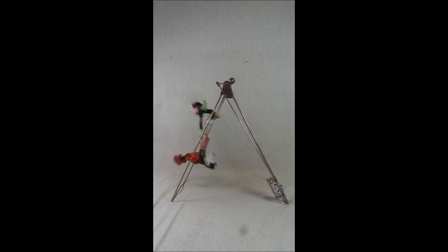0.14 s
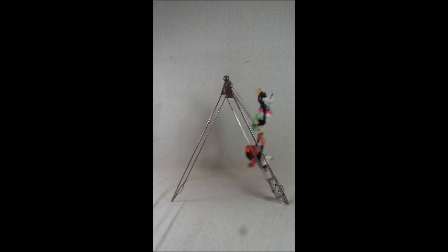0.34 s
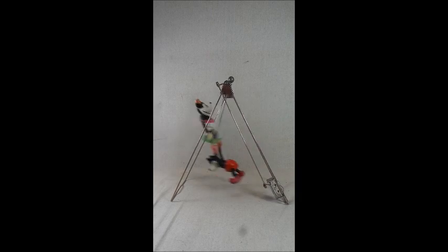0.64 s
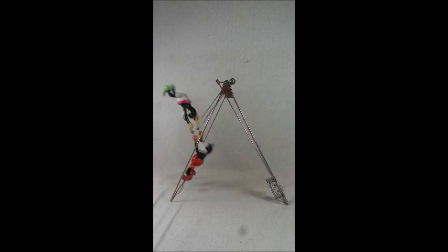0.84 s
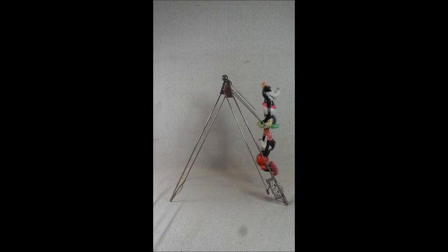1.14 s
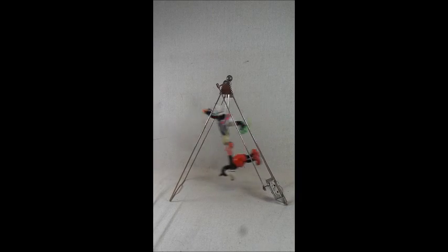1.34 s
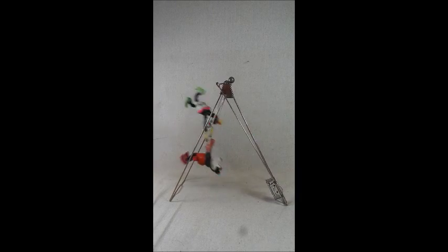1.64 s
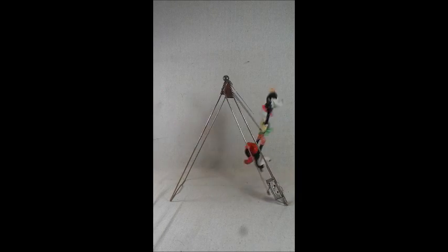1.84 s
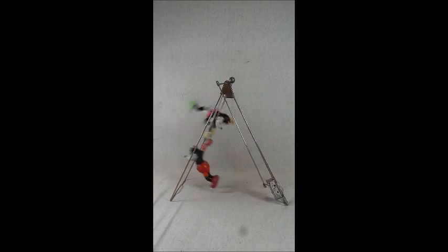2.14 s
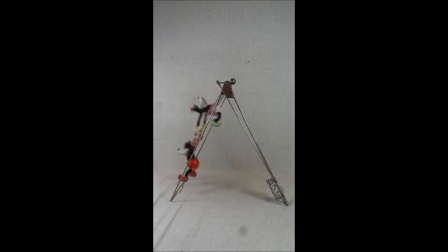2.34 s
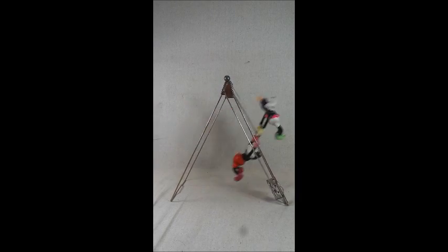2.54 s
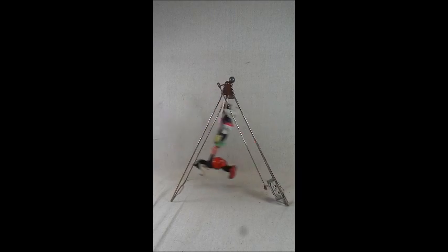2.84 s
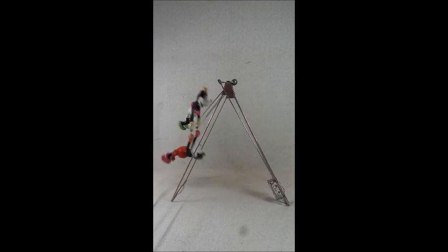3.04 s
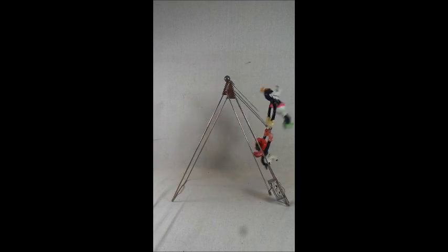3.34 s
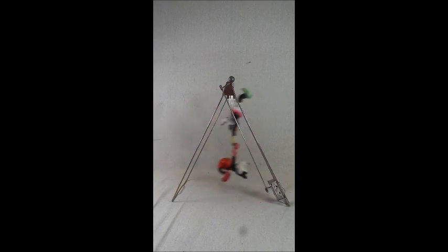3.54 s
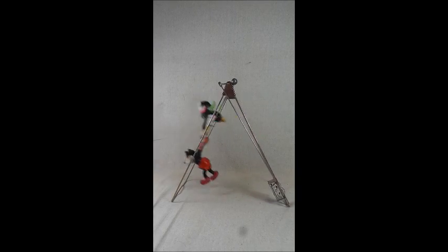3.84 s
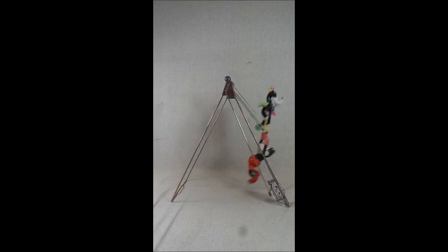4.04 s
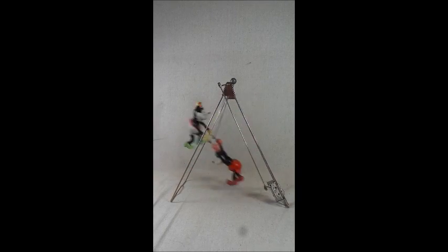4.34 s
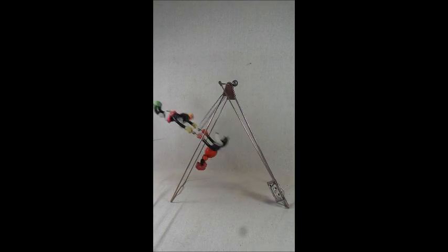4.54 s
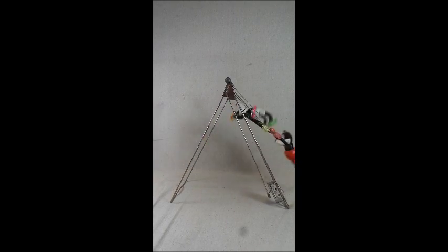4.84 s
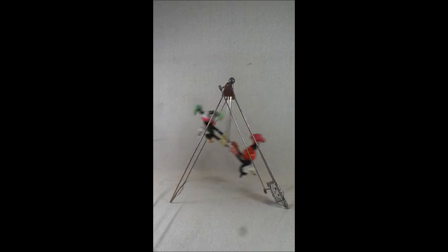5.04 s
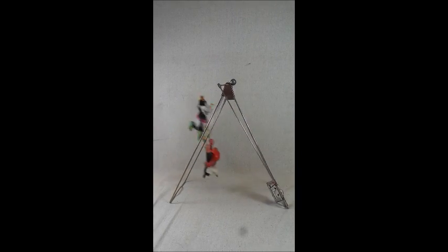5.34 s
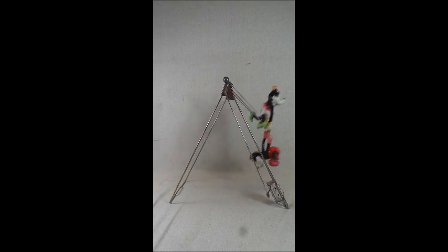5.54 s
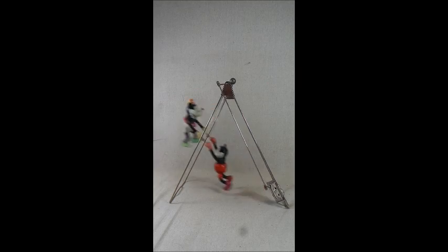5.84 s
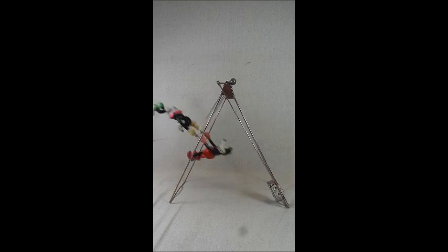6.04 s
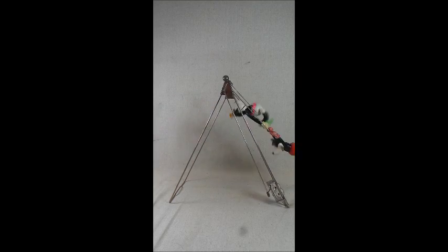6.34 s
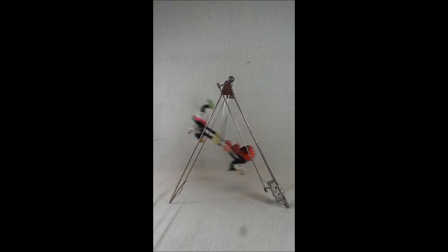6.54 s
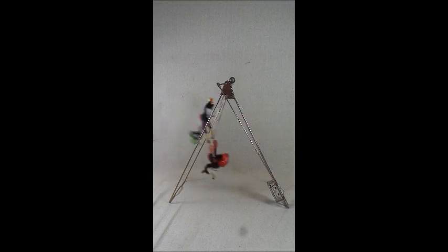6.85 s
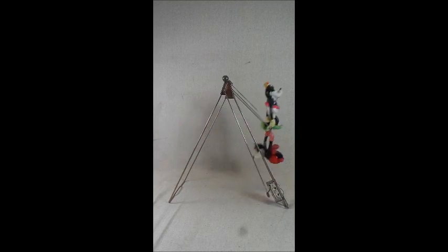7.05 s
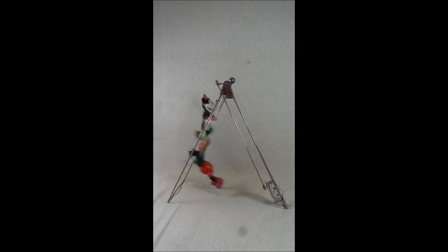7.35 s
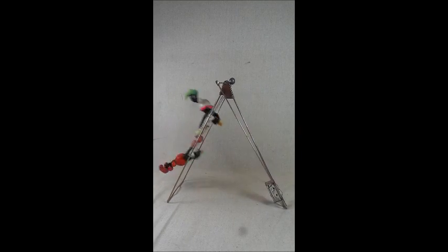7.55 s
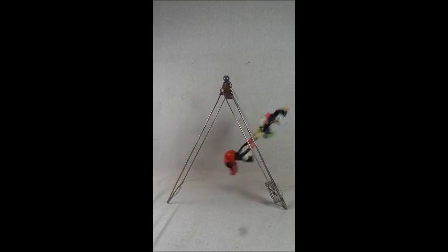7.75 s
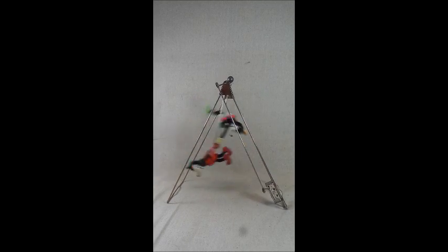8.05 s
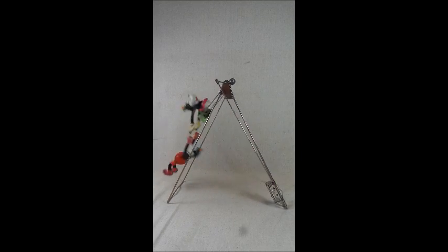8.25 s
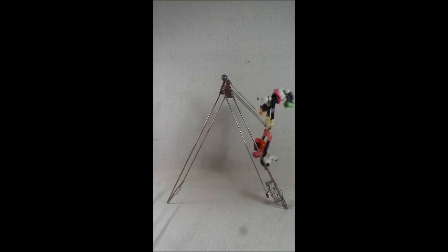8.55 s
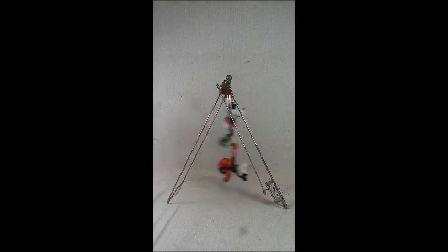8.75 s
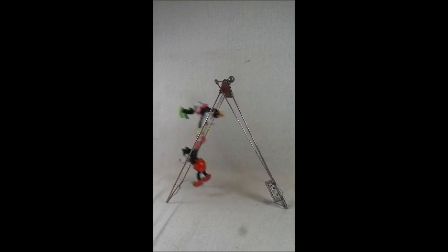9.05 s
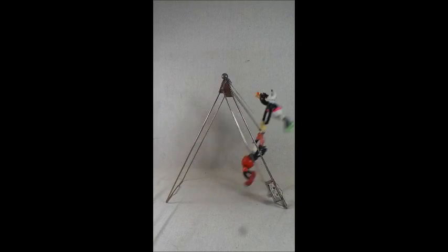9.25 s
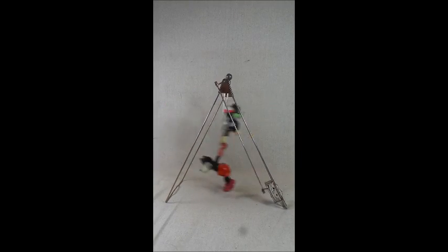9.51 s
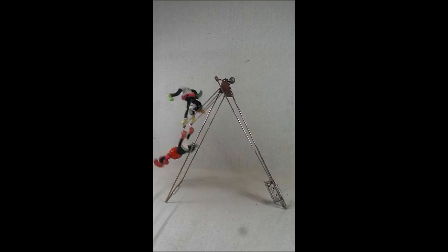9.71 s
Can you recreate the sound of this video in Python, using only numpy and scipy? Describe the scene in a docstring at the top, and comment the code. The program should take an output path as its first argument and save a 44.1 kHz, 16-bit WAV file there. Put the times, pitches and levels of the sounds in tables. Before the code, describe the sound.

A small tin clockwork swing with two jointed tumbling figures runs continuously on a table, heard close in a small bare room with a short bright reflection and very faint room tone. From about 0.2 s to 9.8 s the crank catches every 0.33 to 0.4 s, slightly unevenly: a sharp, dry, high metallic clack, a soft low table thump just after, and often a tiny ping. Loose figures clack irregularly between, densely around 1.2-1.6 s, with strong clacks near 7.05 and 9.67 s. Small tin tinks ring near 1.2, 2.25, 5.0 and 5.5 s. Some catches have a light touch just before them. Quiet gears and scraping swell into each catch; return strokes carry faint slipping whistles, then a rising one. Thin axle chirps stand out near 0.5 and 1.26 s and again around 9.0-9.4 s. The motion is still going at the end.

```python
"""In a small bare room, a tin clockwork swing runs on a table over a faint bed of room tone.
Contacts excite the damped modes of frame, figures and motor housing: the crank touches and catches, loose figures clack.
Each catch also thumps the table top, and many make the frame's top bar ping. Gears and a scraping axle run up to
every catch. The axle chirps at times, and on each return stroke slips twice in faint song before a rising whistle.
Decaying noise adds the walls' answer to the clatter, gears and squeaks."""
import sys
import numpy as np
from scipy import signal
from scipy.fft import rfft, irfft, next_fast_len
from scipy.io import wavfile
from scipy.ndimage import uniform_filter1d, map_coordinates

SR = 44100
rng = np.random.default_rng(int(sys.argv[2]) if len(sys.argv) > 2 else 0)


def master_out(mix):
    """Clip the mix to full scale and print it as 16-bit PCM to the path in sys.argv[1]."""
    frames = np.transpose(np.atleast_2d(mix))
    ceiling = np.clip(frames, -1, 1)
    pcm = np.round(ceiling * 32767).astype(np.int16)
    wavfile.write(sys.argv[1], SR, pcm)


N = 435708  # length in samples
SIZE, LEAD = 2 ** 13, 1024  # event row length, and its part ahead of the contact (samples)

# Resonances of the parts, all four alike: pitch_hz, width_hz, strength_db
FRAME_MODES = [(4580, 830, -4), (7020, 150, 2.5), (8560, 290, -9.5), (7360, 17900, -3.5), (9930, 670, 2),
               (11400, 360, -21), (11720, 810, -2.5)]
FIGURE_MODES = [(1910, 72, -18.5), (2350, 170, -4), (2810, 1460, -21), (3353, 290, -5), (2963, 1950, -7.5)]
HOUSING_MODES = [(558, 150, -18), (946, 164, -3), (860, 110, -5), (1516, 120, -9)]
TABLE_MODES = [(114.5, 6.34, 5.5), (145.4, 13.7, 2.5), (204.7, 27, -8), (243.6, 37, -5), (292, 82, -10),
               (447, 390, -19.5)]
# Crank catches, outward and return stroke in turn:
# start_s, frame_level_db (peak), nominal_t60_s, thump_level_db (peak), grind_level_db (gears before it)
CATCHES = [(0.185, -14, 0.035, -23.5, -60.5), (0.5285, -14.5, 0.071, -27, -55),
           (0.9308, -15.5, 0.04, -27, -68), (1.257, -16.5, 0.15, -26.5, -53), (1.6736, -14, 0.04, -24, -77),
           (2.014, -13.5, 0.086, -25, -56.5), (2.404, -15, 0.067, -24, -57), (2.74, -15.5, 0.098, -25, -62),
           (3.118, -14.5, 0.06, -22.5, -68), (3.478, -17, 0.066, -28, -56), (3.873, -17, 0.057, -23, -78),
           (4.217, -16.5, 0.069, -26.5, -57), (4.6081, -17, 0.05, -22.5, -63),
           (4.9695, -14.5, 0.1, -27, -66), (5.361, -14.5, 0.048, -25, -57.5), (5.7, -16.5, 0.1, -25, -73),
           (6.094, -19, 0.14, -22, -75), (6.4502, -15.5, 0.18, -25, -67), (6.846, -16.5, 0.05, -23.5, -73),
           (7.188, -17, 0.097, -24, -69), (7.6, -14, 0.03, -23, -71), (7.9522, -15, 0.11, -25.5, -65),
           (8.331, -13, 0.029, -25, -54), (8.6772, -16.5, 0.094, -24, -60), (9.067, -15, 0.039, -23.5, -51),
           (9.4235, -15, 0.11, -25.5, -54), (9.8089, -14, 0.043, -22, -82)]
# First touches of the crank on the frame, just ahead of a catch: start_s, frame_level_db (peak)
TOUCHES = [(0.5096, -37), (2.719, -28), (3.2962, -35), (4.199, -25), (4.944, -23.5), (5.3307, -23.5),
           (5.677, -22.5), (6.062, -35), (6.086, -18.5), (6.428, -28), (6.836, -25), (7.589, -32),
           (7.9322, -29.5), (8.656, -19.5), (9.403, -25)]
# Clacks of loose figures: start_s, figure_level_db (peak), frame_db and housing_db (re the figures), nominal_t60_s
CLACKS = [(0.106, -17, -4, -12.5, 0.058), (0.356, -35, -7, -4, 0.062), (0.371, -26, -17, -9, 0.34),
          (0.409, -28, -17, -18, 0.16), (0.492, -33.5, 8, -18, 0.04), (0.633, -28.5, -8, -15, 0.089),
          (0.6972, -28.5, -5, -3.5, 0.13), (0.7219, -25, -6, -16, 0.17), (0.754, -27, -1, -1.5, 0.013),
          (0.805, -22.5, -15, -15, 0.046), (1.035, -34, -22, -19, 0.047), (1.0672, -29, -4, -9.5, 0.082),
          (1.175, -22.5, -18, -17, 0.041), (1.192, -27, -11, -10, 0.032), (1.262, -18.5, -12, -14, 0.12),
          (1.277, -20.5, 1.5, -25, 0.19), (1.294, -23, -3, -25, 0.26), (1.328, -28, -2, -24, 0.075),
          (1.3722, -21, -0.5, -11.5, 0.049), (1.4672, -25.5, -7, -7, 0.15), (1.5932, -19, -1.5, -13, 0.05),
          (1.833, -27, -1, -7.5, 0.049), (1.8815, -20.5, -20, -10.5, 0.034), (1.9745, -24, 6, -13, 0.21),
          (2.142, -24.5, -14, -14, 0.094), (2.247, -20.5, -20, -5.5, 0.052),
          (2.3483, -27.5, -15, -5.5, 0.19), (2.5892, -31.5, -15, -5, 0.46), (2.659, -31, -14, -10, 0.037),
          (2.809, -26, -28, -11, 0.15), (3.003, -37.5, -26, -2, 0.12), (3.082, -32, -21, -6.5, 0.34),
          (3.3857, -25, -17, -11, 0.069), (3.427, -26.5, 1, -8, 0.17), (3.6352, -22.5, -9, -16.5, 0.061),
          (3.7535, -27.5, -3, -9.5, 0.45), (3.802, -18.5, -6, -8.5, 0.036), (3.81, -18.5, 3, -6, 0.032),
          (3.971, -38, -9, -12, 0.06), (4.0652, -28, -5, -8, 0.43), (4.385, -34.5, -2, -1.5, 0.14),
          (4.401, -31, 2, -17, 0.017), (4.443, -32, -20, -1, 0.27), (4.562, -37, -3, -1, 0.04),
          (4.74, -35, -14, -3.5, 0.15), (5.0657, -24.5, -14, -9.5, 0.069), (5.444, -30, -4, -9.5, 0.097),
          (5.485, -21.5, -23, -17, 0.1), (5.5426, -25, 0, -9, 0.12), (5.8, -37, -20, -25, 0.075),
          (5.8497, -38, 15.5, 3, 0.012), (5.896, -25.5, -4, -24, 0.021), (5.933, -30.5, -27, -4.5, 0.24),
          (6.225, -43.5, -11, 0, 0.022), (6.281, -25, -21, -9.5, 0.086), (6.369, -31, -19, -3, 0.061),
          (6.516, -24.5, 2, -30, 0.027), (6.5473, -21, -24, -12.5, 0.035), (6.624, -44.5, -22, 2, 0.27),
          (6.6703, -29, -1, -11, 0.04), (6.7155, -25.5, -10, -5.5, 0.077), (6.7385, -20.5, -3, -21, 0.055),
          (7.0503, -15, -13, -18.5, 0.035), (7.167, -40, 16.5, -6, 0.13), (7.399, -24.5, -7, -7.5, 0.21),
          (7.422, -20, -5, -11.5, 0.11), (7.364, -38.5, -7, 0.5, 0.14), (7.4852, -21, -10, -16, 0.062),
          (7.7611, -25.5, -4.5, -10.5, 0.22), (7.891, -22, -24, -39, 0.013), (8.058, -21.5, -12, -15, 0.16),
          (8.156, -32, -21, -21, 0.2), (8.1881, -23.5, -0.5, -19, 0.023), (8.2618, -23, -8, -22, 0.045),
          (8.298, -33, 1, -12, 0.07), (8.5841, -33.5, -14, -4, 0.33), (8.864, -55, -18, -17, 0.036),
          (8.899, -20.5, -7.5, -30, 0.04), (9.3366, -23.5, -13, -10, 0.032), (9.561, -23, -21, -15.5, 0.14),
          (9.57, -27.5, -22, -8, 0.04), (9.656, -34.5, -1, 4, 0.02), (9.6666, -15.5, -22, -8, 0.02),
          (9.678, -16.5, 0, -23, 0.035), (9.765, -43, 10, -11, .05)]
# Pings of the frame's top bar as the crank lands: middle_s, level_db (peak)
PINGS = [(0.188, -15), (0.532, -19), (0.933, -20.5), (1.297, -23), (1.679, -28), (2.414, -22), (2.752, -37),
         (3.131, -27), (3.483, -17), (3.879, -16.5), (4.218, -20), (4.618, -19), (4.975, -20.5),
         (5.367, -19), (5.704, -17), (6.1, -15), (6.456, -26), (6.854, -19), (7.605, -16.5), (8.339, -19),
         (8.68, -24), (9.075, -15.5), (9.816, -14)]
# Single pieces of tin ringing out of a clack: middle_s, pitch_hz, level_db (peak)
TINKS = [(1.179, 2980, -23), (2.25, 1060, -27), (4.994, 2880, -23.5), (5.487, 3200, -26)]
# Loudest chirps of the dry axle: middle_s, pitch_hz, level_db (before flutter), length_s (scale of the swell)
CHIRPS = [(0.512, 7900, -24, 0.012), (1.258, 8100, -22.5, 0.014), (1.967, 13500, -40, .03),
          (4.16, 13100, -35, 0.069), (4.886, 8210, -33, 0.047), (5.612, 8190, -37.5, 0.066),
          (6.339, 8400, -49, 0.022), (7.858, 7140, -38, 0.04), (8.599, 8060, -34, 0.014),
          (9.042, 7580, -30, .02), (9.345, 8000, -28.5, 0.022), (9.41, 7800, -23, 0.019)]
# Modes on which the slipping axle sings: pitch_hz, first_slip_db, second_slip_db (before scatter)
SINGING_MODES = [(6950, -48, -50), (8200, -59, -52), (9750, -54, -61), (11600, -54, -61), (13400, -58, -52)]
# Decay of the walls' answer: pitch_hz, t60_s
WALLS = [(150, 0.45), (2000, 0.2), (12000, 0.15)]
# Spectrum of the room tone, relative: pitch_hz, density_db
ROOM_TONE = [(20, 26), (60, 16), (120, 34), (400, -39), (1000, 9), (14000, -41)]

# Pairs hold the outward stroke, then the return stroke
CATCH_RISE_S, CATCH_FIGURES_DB, CATCH_HOUSING_DB = (0.0094, 0.0068), -8, -17  # levels re the frame
TOUCH_T60_S, TOUCH_RISE_S, TOUCH_FIGURES_DB, TOUCH_HOUSING_DB = 0.075, 0.0064, -18.5, -17
CLACK_RISE_S = 0.00058
CATCH_COLOUR_DB, CLACK_COLOUR_DB = 2, 2.2  # scatter of mode strengths from blow to blow
PITCH_SCATTER = 0.035  # share by which the loose tin's modes shift from blow to blow
THUMP_LAG_S, THUMP_SCATTER_DB = (0.0081, 0.00436), 2
THUMP_DAMPED_S = 0.07  # the rocking frame settles on its feet and damps the boom
PING_HZ, PING_RISE_S, PING_T60_S = 7020, 0.0013, 0.0094
RUN_UP_S, RUN_ON_S = (0.197, 0.164), (0.05, 0.012)  # turning before and after the catch
RUN_GROWTH_DB, SCRAPE_DB = (4.5, 5.5), (-80, -60)
SHAKE_DB, SHAKE_FOLLOWS, USUAL_GRIND_DB = -52, 0.33, -54.5  # shake at the usual grind; dB per dB of grind
RISE_PER_S = 0.401  # share of the pitch gained a second
STOPS_FASTER = 9.1  # a chirp ends more quickly than it swells
WAVER_HZ, FLUTTER_DB, FAINT_ROUGHER = 90, 5, 1.6  # unsteadiness of a whistle; factor for faint ones
WHISTLE_LEAD_S = 0.04  # from the contact position in a row to a whistle's middle
SLIPS_AHEAD_S = (0.14, 0.075)  # middles of first and second slip, ahead of the catch
SING_S, SING_SCATTER_S, SING_SCATTER_DB, SING_SCATTER_PITCH = 0.05, 0.008, 4, 0.01
SWEEP_AHEAD_S, SWEEP_HZ, SWEEP_DB, SWEEP_RISE_PER_S = 0.04, 9000, -51, 3.5
TOP_HZ, EDGE_HZ = 15900, 14460  # band limit; start of the steep fade
DULLS_HZ, DULLS_DB_PER_HZ = 10800, -0.0012  # gentle loss of the top treble


def clatter():
    """Impact excitation: figures clack at once, while touches and catches build up in the frame."""
    s, db, t60 = np.transpose(CATCHES)[:3, :, None]
    catches = rattle(s, db, db + CATCH_FIGURES_DB, db + CATCH_HOUSING_DB, t60, stroke(CATCH_RISE_S))
    s, db = np.transpose(TOUCHES)[:, :, None]
    touches = rattle(s, db, db + TOUCH_FIGURES_DB, db + TOUCH_HOUSING_DB, TOUCH_T60_S, TOUCH_RISE_S)
    s, db, frame_db, housing_db, t60 = np.transpose(CLACKS)[:, :, None]
    clacks = rattle(s, db + frame_db, db, db + housing_db, t60, CLACK_RISE_S, CLACK_COLOUR_DB)
    return catches + touches + clacks


def rattle(s, frame_db, figure_db, housing_db, t60, rise, scatter_db=CATCH_COLOUR_DB):
    """Repeated impact: uneven bounces ring the modes of frame, figures and housing."""
    t = (np.arange(SIZE - LEAD) - LEAD) / SR

    def swell(t, slower):
        decay = amp(-60 * np.maximum(t, 0) / np.clip(slower * t60, .005, .4))
        return decay / (1 + np.exp(np.minimum(1.2 - 2 * t / rise, 50)))

    def lumps(size):
        noise = rng.standard_normal((len(s), len(t)))
        return unit(uniform_filter1d(noise, size=size, axis=1))

    bounces = amp(3.8 * lumps(size=60))  # shared by the three parts
    # modes, peak level, delay (s), decay factor: loose tin starts late, rattles on
    parts = [(FRAME_MODES, frame_db, 0, 1),
             (FIGURE_MODES, figure_db, 1.35 * rise, 1.4),
             (HOUSING_MODES, housing_db, 0.63 * rise, 1.4)]
    rows = 0
    for modes, part_db, late, slower in parts:
        push = swell(t - late, slower) * bounces * amp(1.48 * lumps(size=250))
        push = push * chatter(bounces.shape, spiky_db=2.5)
        rows = rows + amp(part_db) * strike(s, push, modes, scatter_db)
    return place(s[:, 0], rows)


def chatter(shape, spiky_db):
    """Random contact force: noise whose samples differ widely in size."""
    return rng.standard_normal(shape) * amp(spiky_db * rng.standard_normal(shape))


def thumps():
    """Impulse response of a plate: a first touch, a soft push and two rebounds set the table top booming."""
    caught, _, _, db, _ = np.transpose(CATCHES)[:, :, None]
    s = caught + stroke(THUMP_LAG_S)
    t = (np.arange(SIZE // 2) - LEAD) / SR

    def bump(at):
        return np.exp(-((t - at) / .0006) ** 2)

    late = rng.random((len(s), 2, 1))
    push = amp(-5.5) * bump(-0.0062) + bump(0.00427)
    push = push + amp(-6) * bump(0.01295 + 0.0051 * late[:, 0])
    push = push + amp(-3.0) * bump(0.025 + 0.0125 * late[:, 1])
    damped = 1 / (1 + ((np.arange(SIZE) - LEAD) / SR / THUMP_DAMPED_S) ** 4)
    boom = strike(s, push, TABLE_MODES, THUMP_SCATTER_DB, loose=0)
    return place(s[:, 0], amp(db) * damped * boom)


def pings():
    """Single-mode ringing: a tone swells quickly and is damped at once; lower tones last longer."""
    events = [(s, PING_HZ, db) for s, db in PINGS] + TINKS
    s, hz, db = np.transpose(events)[:, :, None]
    t = (np.arange(SIZE) - LEAD) / SR
    cycles = hz * t * (1 + .02 * rng.standard_normal(s.shape))
    scaled = t * np.sqrt(hz / PING_HZ)
    swell = np.where(t < 0, np.exp(-(scaled / PING_RISE_S) ** 2), amp(-60 * np.abs(scaled) / PING_T60_S))
    return place(s[:, 0], amp(db) * swell * np.sin(2 * np.pi * cycles))


def squeaks():
    """Stick-slip friction heard as whistles: chirps swell and stop, slips hold their song, the sweep climbs."""
    s, hz, db, length = np.transpose(CHIRPS)[:, :, None]

    def chirp(t):
        return np.exp(-(3.2 * t / length * np.where(t > 0, STOPS_FASTER, 1)) ** 2)

    def hold(t):
        return np.exp(-(2 * t / SING_S) ** 4)

    chirps = whistles(s, hz, db, RISE_PER_S, chirp)
    returns = np.array(CATCHES)[1::2, :1]
    slips = (returns - SLIPS_AHEAD_S).reshape(-1, 1)
    mode_hz, *slip_db = np.transpose(SINGING_MODES)
    a, b, c = rng.standard_normal((3, len(slips), len(SINGING_MODES)))
    sing_s = slips + SING_SCATTER_S * a
    sing_hz = mode_hz * (1 + SING_SCATTER_PITCH * b)
    sing_db = np.resize(slip_db, c.shape) + SING_SCATTER_DB * c
    columns = np.reshape([sing_s, sing_hz, sing_db], (3, -1, 1))
    song = whistles(*columns, RISE_PER_S, hold, FAINT_ROUGHER)
    sweep_db = SWEEP_DB + SING_SCATTER_DB * rng.standard_normal(returns.shape)
    sweeps = whistles(returns - SWEEP_AHEAD_S, SWEEP_HZ, sweep_db, SWEEP_RISE_PER_S, hold, FAINT_ROUGHER)
    return chirps + song + sweeps


def whistles(s, hz, db, rise, swell, rough=1):
    """Frequency and amplitude modulation: thin, unsteady tones centred on s, shaped by swell."""
    t = (np.arange(SIZE) - LEAD) / SR - WHISTLE_LEAD_S

    def slow(size):
        return unit(uniform_filter1d(rng.standard_normal((len(s), SIZE)), size=size, axis=1))

    pitch = hz * (1 + rise * t) + rough * WAVER_HZ * slow(size=120)
    phase = 2 * np.pi * np.cumsum(pitch, axis=1) / SR
    level = amp(db + rough * FLUTTER_DB * slow(size=150))
    return place(s[:, 0] - WHISTLE_LEAD_S, level * swell(t) * np.sin(phase))


def running():
    """Friction-driven resonance: gear teeth and axle rub in uneven lumps, and the table shakes with them."""
    caught, *_, grind_db = np.transpose(CATCHES)[:, :, None]
    s = caught - stroke(RUN_UP_S)
    length = stroke(RUN_UP_S) + stroke(RUN_ON_S)
    knots = np.arange(0, N / SR + .01, .002)
    t = knots - s
    turning = np.clip(t / 0.017, 0, 1) * np.clip((length - t) / 0.074 + 1, 0, 1)
    turning = turning * amp(stroke(RUN_GROWTH_DB) * (np.clip(t / length, 0, 1) + 0.5))

    def level(db, rest_db):
        return np.interp(np.arange(N) / SR, knots, (amp(db) * turning).sum(axis=0) + amp(rest_db))

    rumble = amp(3.5 * wobble(14)) * rng.standard_normal(N)
    shake = filtered(rumble, lambda f: shapes(TABLE_MODES, f).sum(axis=0))
    # the drive of each mode comes and goes by itself
    teeth = amp(3 * wobble(70)) * ticks(rate=600, spread_db=2.2)
    meshing = np.array([amp(4 * wobble(20)) * teeth for _ in HOUSING_MODES + FIGURE_MODES])
    gear_modes = lambda f: np.vstack([shapes(HOUSING_MODES, f), amp(-2.5) * shapes(FIGURE_MODES, f)])
    grind = filtered(meshing, gear_modes).sum(axis=0)
    slips = ticks(rate=1200, spread_db=1.8)
    rubs = np.array([amp(4.5 * wobble(30)) * slips for _ in FRAME_MODES])
    scrape = filtered(rubs, lambda f: shapes(FRAME_MODES, f)).sum(axis=0)
    gears = level(grind_db, rest_db=-66) * unit(grind)
    gears = gears + level(stroke(SCRAPE_DB), rest_db=-68.5) * unit(scrape)
    shake_db = SHAKE_DB + SHAKE_FOLLOWS * (grind_db - USUAL_GRIND_DB)
    return gears, level(shake_db, rest_db=-47.5) * unit(shake)


def ticks(rate, spread_db):
    """Shot noise: sparse contacts (rate a second) of widely different size over a fine rasp."""
    sparse = (rng.random(N) < rate / SR) * amp(spread_db * rng.exponential(size=N))
    return unit(sparse) + amp(-10) * rng.standard_normal(N)


def room(x, count=60):
    """Reverberation as decaying noise: a fresh random tail for each of count equal pieces avoids a fixed tone."""
    hz, t, z = signal.stft(rng.standard_normal((count, SR // 2)), SR, nperseg=256)
    decay = amp(-60 * t / along(WALLS, hz)[:, None])
    tails = signal.istft(z * decay, SR, nperseg=256)[1]
    tails = tails / np.linalg.norm(tails, axis=1, keepdims=True)
    step = -(-N // count)
    pieces = np.pad(x, (0, step * count - N)).reshape(count, step)
    wet = signal.fftconvolve(pieces, tails, axes=1)
    out = np.zeros(N + 2 * SR)
    for k, row in enumerate(wet):
        out[k * step + 130:][:len(row)] += row  # the echoes start 130 samples late
    return out[:N]


def room_tone():
    """Stationary background: white noise shaped by a fixed spectrum."""
    return unit(filtered(rng.standard_normal(N), lambda f: amp(along(ROOM_TONE, f))))


def strike(starts, pushes, modes, scatter_db, loose=PITCH_SCATTER):
    """Modal excitation: each push rings the modes at new strengths and pitches, one row an event, peak 1."""
    f = np.fft.rfftfreq(SIZE, 1 / SR)
    a, b = rng.standard_normal((2, len(modes), len(starts), 1))
    colour = (amp(scatter_db * a) * shapes(modes, f, 1 + loose * b)).sum(axis=0)
    rows = irfft(rfft(pushes, SIZE) * colour, SIZE)
    return rows / np.abs(rows).max(axis=1, keepdims=True)


def shapes(modes, f, shift=None):
    """Damped oscillators: one causal resonance a row, signs alternating; shift scales each pitch."""
    shift = np.ones(len(modes)) if shift is None else shift
    rows = []
    for k, ((hz, width, db), scale) in enumerate(zip(modes, shift)):
        damping = 1j * f * width
        rows.append((-1) ** k * amp(db) * damping / ((hz * scale) ** 2 - f * f + damping))
    return np.array(rows)


def place(starts, rows):
    """Superposition: sum the event rows, each beginning LEAD samples ahead of its time."""
    out = np.zeros(N + 2 * SIZE)
    for s, row in zip(starts, rows):
        out[round(s * SR):][:SIZE] += row
    return out[LEAD:LEAD + N]


def stroke(pair):
    """Alternation: the outward or return value for each catch, as a column."""
    return np.resize(pair, len(CATCHES))[:, None]


def filtered(x, response):
    """Linear filtering: the spectrum of x times a complex response of frequency."""
    m = next_fast_len(N + SR // 2)
    return irfft(rfft(x, m) * response(np.fft.rfftfreq(m, 1 / SR)), m)[..., :N]


def along(points, hz):
    """Interpolation of (pitch, value) points on a logarithmic frequency axis."""
    f, v = np.transpose(points)
    return np.interp(np.log(hz + 1), np.log(f + 1), v)


def wobble(rate):
    """Slow random modulation: a smooth curve with rate knots a second."""
    knots = rng.standard_normal(int(N * rate / SR) + 4)
    return map_coordinates(knots, [np.arange(N) * rate / SR])


def amp(db):
    """Decibels to amplitude ratio."""
    return 10 ** (np.asarray(db) / 20)


def unit(x):
    """Normalisation to an RMS of 1."""
    return x / np.sqrt(np.mean(x ** 2, axis=-1, keepdims=True) + 1e-20)


def scene():
    """Superposition of direct sound, wall echoes and room tone, alike in both channels."""
    gears, shake = running()
    metal = clatter() + squeaks() + gears
    echoes = amp(-5.0) * room(metal)
    mid = metal + echoes + pings() + thumps() + shake + amp(-50.0) * room_tone()
    return np.array([mid, mid])


def record(dry):
    """Overall tone by filtering: little deep bass, gently softened top treble, a steep fade, then a band limit."""
    def response(hz):
        bass = 1j * hz / (1j * hz + 70)
        dull = amp(DULLS_DB_PER_HZ * np.maximum(hz - DULLS_HZ, 0))
        edge = amp(-.07 * np.maximum(hz - EDGE_HZ, 0))
        return (hz < TOP_HZ) * bass * dull * edge

    return filtered(dry, response)


dry = scene()
out = record(dry)
master_out(out)
```